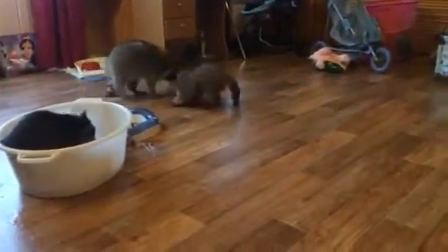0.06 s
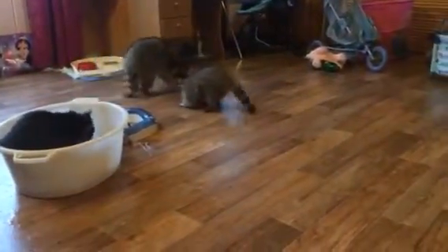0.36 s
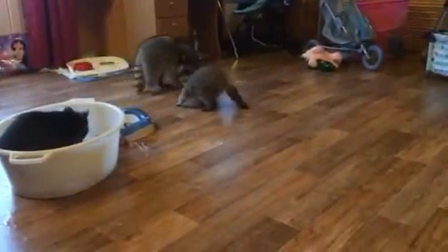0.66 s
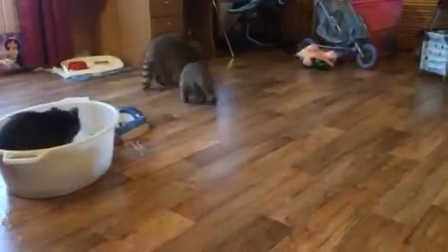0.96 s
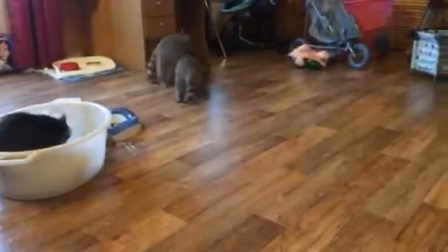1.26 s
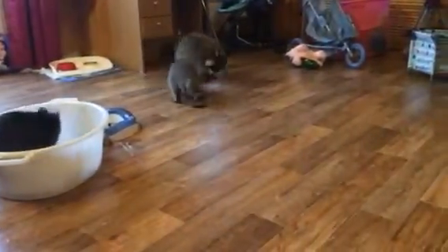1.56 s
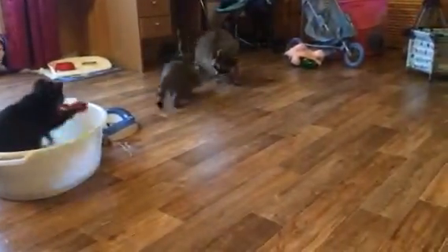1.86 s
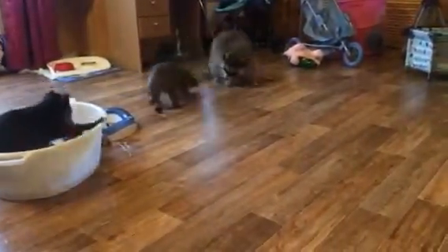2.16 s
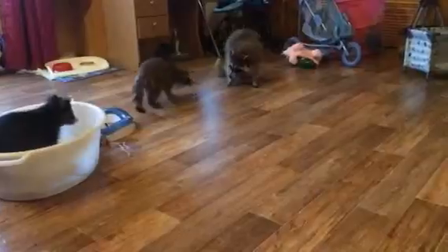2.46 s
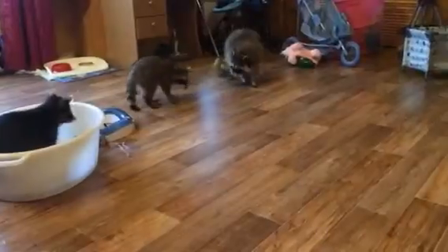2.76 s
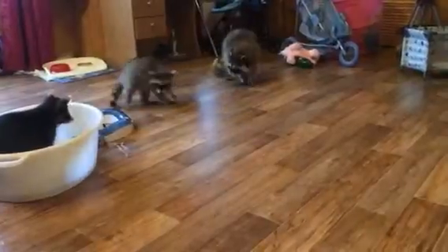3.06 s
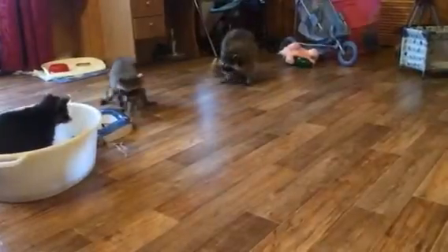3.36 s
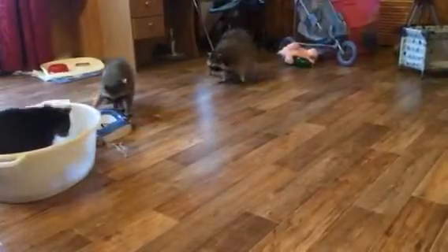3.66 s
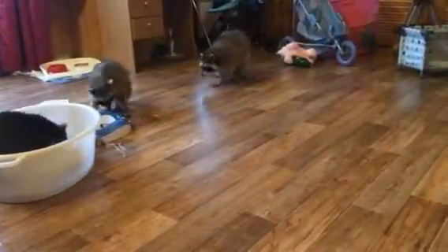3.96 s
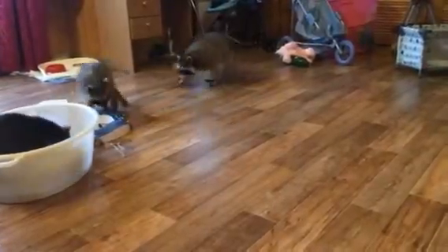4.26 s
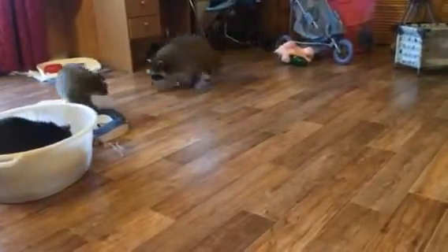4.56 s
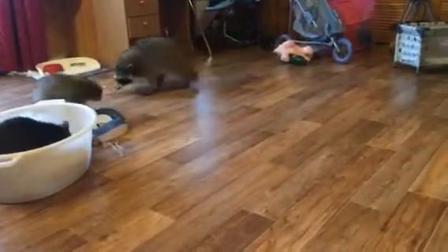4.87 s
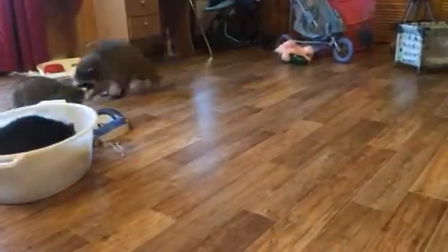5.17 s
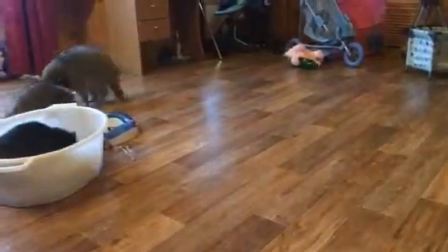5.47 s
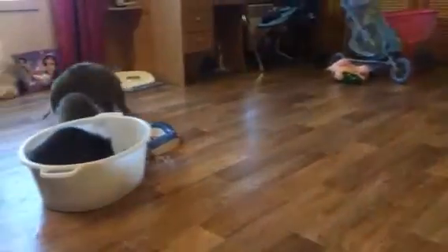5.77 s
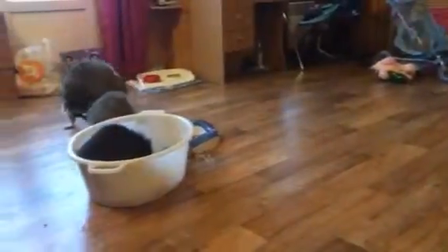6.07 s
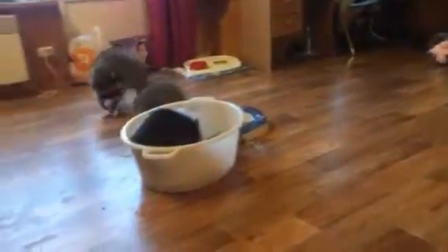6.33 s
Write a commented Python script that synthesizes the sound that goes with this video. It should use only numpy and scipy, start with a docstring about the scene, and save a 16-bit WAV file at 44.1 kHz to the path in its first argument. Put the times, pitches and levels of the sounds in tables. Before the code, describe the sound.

Two raccoons snarl and grumble at each other indoors, with claws pattering and one sharp bang on a hard floor.

```python
"""A living room with a hard floor; two raccoons squabble a few metres from a hand-held camera's microphone.
They snarl in slow rattling pulses as slaps of the vocal folds and rasping air ring chest, throat, mouth
and teeth; they grunt, spit once and grumble with closed mouths. Paws and claws patter, scuff and skid,
and something hard bangs on the floor. The room rings briefly; close up, the hand creaks on the camera."""
import sys
import numpy as np
from scipy import signal
from scipy.io import wavfile
from scipy.ndimage import uniform_filter1d

SR = 44100
rng = np.random.default_rng(int(sys.argv[2]) if len(sys.argv) > 2 else 0)


def dump_mix(stems):
    """Bounce the given channels to the path in sys.argv[1] as a 16-bit WAV at rate SR."""
    frames = np.atleast_2d(stems).T  # one column per channel
    limited = np.clip(frames, -1, 1)  # hard clip at full scale
    pcm = np.round(limited * 32767).astype(np.int16)
    wavfile.write(sys.argv[1], SR, pcm)


N = 286650
T = np.arange(N) / SR


def amp(db):
    return 10 ** (np.asarray(db) / 20)


def unit(x):
    """Scales to rms 1."""
    return x / np.sqrt(np.mean(x ** 2) + 1e-20)


def steady(x):
    """Holds the rms at 1 over a few pulse periods."""
    return x / np.sqrt(abs(uniform_filter1d(x ** 2, size=3200)) + 1e-14)


def read(points, hz):
    """Reads a spectrum on a log-frequency axis."""
    f, value = np.transpose(points)
    return np.interp(np.log(hz + 1), np.log(f), value)


def curves(rows):
    """Each column after the time as a curve over the whole scene."""
    s, *columns = np.transpose(rows)
    return [np.interp(T, s, c) for c in columns]


def gate(rows):
    """One while a table lasts, with soft edges."""
    return uniform_filter1d(1. * ((T >= rows[0][0]) & (T <= rows[-1][0])), size=400)


def swell(start, length, db, attack_share, release_s):
    """Rises over a share of its length, holds, then dies away."""
    rise = np.clip((T - start) / (attack_share * length), 0, 1)
    return amp(db) * rise * np.exp(-np.maximum(T - start - length, 0) / release_s)


def wander(per_s):
    """A random curve of rms about 1, with per_s new values a second."""
    return np.interp(T * per_s, np.arange(N), rng.standard_normal(N))


def pulses(turns):
    """One click at each whole turn."""
    return 1. * (np.diff(np.floor(turns), prepend=np.floor(turns[0])) > 0)


def add(mix, s, sound):
    """Mixes a sound in at s seconds."""
    part = mix[max(round(s * SR), 0):][:len(sound)]
    part += sound[:len(part)]


def colour(x, spectrum, shade=lambda hz: 0):
    """Causal filter of energy 1 from a spectrum and an optional extra dB rule."""
    hz = abs(np.fft.fftfreq(2048, 1 / SR)) + 1
    log_gain = np.log(amp(np.maximum(read(spectrum, hz) + shade(hz), -100)))
    taps = np.fft.ifft(np.exp(np.conj(signal.hilbert(log_gain)))).real
    return signal.fftconvolve(x, taps / np.linalg.norm(taps))[:len(x)]


def resonate(x, hz, width_hz):
    """A steep resonance that follows the curve hz."""
    turn = np.exp(2j * np.pi * np.cumsum(hz * np.ones(N)) / SR)
    r = np.exp(-np.pi * width_hz / SR)
    return 2 * (turn * signal.lfilter([(1 - r) ** 2], [1, -2 * r, r * r], x / turn + 1e-18)).real


# Room tone at the microphone. Each row: frequency in Hz, relative level in dB.
AIR_COLOUR = [(15, -44), (25, -19), (69, -6), (267, -13), (457, -19), (523, -15.5), (722, -22), (782, -21),
              (2120, -31), (2920, -30), (4620, -33), (5140, -31), (15500, -38)]
def air():
    """The quiet room and the hiss of the microphone, wavering slightly."""
    waver = amp(.8 * wander(14))
    return amp(-68.5) * unit(colour(rng.standard_normal(N) * waver, AIR_COLOUR))


# The ring of the living room. Each row: frequency in Hz, seconds to fall 60 dB.
ROOM_DECAY = [(80, .48), (250, .35), (600, .33), (1400, .33), (4000, .37), (8000, .34), (15000, .29)]
def echoes():
    """The room's answer to one spot on the floor: a tail of energy 1 that lasts longest in the bass."""
    hz, t, noise = signal.stft(rng.standard_normal(SR // 2), SR, nperseg=256)
    fade = amp(-60 * t / read(ROOM_DECAY, hz)[:, None])
    tail = signal.istft(noise * fade, SR, nperseg=256)[1][:SR // 2]
    tail *= np.clip((T[:SR // 2] - .003) / .007, 0, 1)
    return tail / np.linalg.norm(tail)


def room(x, wet_db):
    """The direct sound reaches the microphone, then three wall echoes and the tail."""
    tail = echoes()
    for s, gain in [(.0068, .25), (.0105, -0.17), (.0135, 0.18)]:
        add(tail, s, np.array([gain]))
    return (x + amp(wet_db) * signal.fftconvolve(x, tail)[:N]) / np.sqrt(1 + amp(wet_db) ** 2)


# Fur and paws sliding on the floor, and the faint rustle while the animals keep moving.
# Each row: start in seconds, length in seconds, level in dB.
SCUFFS = [(0, 0.048, -66), (0.137, 0.084, -59), (0.281, .055, -58.5), (1.101, 0.074, -43),
          (1.232, .04, -54), (1.289, 0.014, -42), (1.37, 0.22, -57.5), (1.624, 0.12, -57),
          (1.745, 0.11, -59), (1.876, 0.077, -67), (2.107, 0.2, -59), (2.65, 0.091, -58.5),
          (4.084, 0.21, -63.5), (4.674, 0.095, -64.5), (4.937, 0.032, -64.5), (5.05, 0.16, -68),
          (5.574, .18, -63.5), (5.972, 0.16, -65), (6.13, 0.18, -62.5), (6.38, 0.058, -58)]
RUSTLES = [(0, 2.45, -68), (4.095, 0.71, -72), (4.95, 2.1, -69.5)]
# Their hiss from a few metres. Each row: frequency in Hz, relative level in dB.
SCUFF_COLOUR = [(530, -25), (900, 0.5), (1800, -5.5), (2480, -8), (2660, -9), (5180, -8), (6050, -7),
                (7770, -8.5), (11800, -13.5), (15500, -18)]
def scuffs():
    """Grainy friction hiss: single strokes over a faint uneven rustle."""
    grains = rng.standard_normal(N) * amp(2.1 * wander(500))
    stroke_power = sum(swell(*row, attack_share=0.37, release_s=0.02) ** 2 for row in SCUFFS)
    rustle = sum(swell(*row, attack_share=0.031, release_s=0.052) for row in RUSTLES)
    rustle *= amp(1.5 * wander(31))
    return unit(colour(grains, SCUFF_COLOUR)) * np.sqrt(stroke_power + rustle ** 2)


# Three open-mouthed snarls, a few metres off.
# Each row: time in seconds, effort in dB, mouth resonance in Hz.
WARNING = [(.005, -48.5, 1160), (.115, -46.5, 1490), (.195, -47, 1440), (.29, -53, 1050), (.37, -51, 910),
           (.5, -72, 920)]
RETORT = [(1.225, -43, 1320), (1.28, -41.5, 1720), (1.37, -56, 1630), (1.44, -48, 1540), (1.51, -47, 1630)]
THREAT = [(1.51, -46, 1730), (1.555, -42, 1680), (1.62, -42, 1440), (1.675, -44, 1490), (1.735, -50, 1190),
          (1.79, -48, 1096), (1.86, -77, 990)]
# Each rattle slows as the air runs out. Each row: the snarl's course, time of one pulse in seconds,
# pulse rate there in Hz, slowing in Hz a second, breathiness from 0 to 1, seconds for the folds to catch.
RATTLES = [(WARNING, .1002, 42, 9, .2, .09), (RETORT, 1.2612, 39.6, 16, .14, .035),
           (THREAT, 1.6376, 42.6, 42, .13, .1)]
# The timbre of each snarl. Each row: mouth resonance width in Hz, teeth resonance in Hz,
# then chest, throat and teeth levels in dB relative to the mouth at full effort.
SNARL_TIMBRES = [(710, 2290, -5, -8.5, -16), (380, 2470, -9, -14.5, -24), (410, 2350, -10.5, -10, -8)]
def snarl(course, pulse_at, rate, slowing, breath, catch_s,
          width_hz, teeth_hz, chest_db, throat_db, teeth_db):
    """Slow slaps of the vocal folds and rasping air ring chest, throat, mouth and teeth."""
    effort, mouth_hz = curves(course)
    slack_db = effort.max() - effort
    jaw_open = np.clip((mouth_hz - 1080) / 450, 0, 1)
    # more breath until the folds catch, and again as the jaws close
    loose = 1 - np.clip((T - course[0][0]) / catch_s, 0, 1) ** 4
    breathy = np.clip(breath + .6 * loose + 0.55 * (1 - jaw_open) ** 2, 0, 1)
    age = np.clip(T - pulse_at, -.5, .5)
    turns = (T - pulse_at) * (rate - slowing * age / 2)
    stray_slaps = .35 * (rng.random(N) < 25 / SR)
    slaps = unit((pulses(turns) + stray_slaps) * amp(1.5 * wander(40)))
    airflow = 5.1 + np.exp(-(turns % 1) / 0.028)
    rasp = unit(rng.standard_normal(N) * airflow * amp(2 * wander(250)))
    drive = np.sqrt(1 - breathy) * slaps + np.sqrt(breathy) * rasp
    # open jaws damp the mouth resonance; as they close it sinks and narrows to a whine
    wide = steady(resonate(drive, mouth_hz, width_hz))
    whine = steady(resonate(drive, mouth_hz, width_hz=250))
    mouth = amp(-slack_db) * steady(jaw_open * wide + (1 - jaw_open) * whine)
    # the lips draw back and lift the teeth resonance
    bared_hz = teeth_hz + 2.4 * np.maximum(mouth_hz - 1540, 0)
    # the teeth ring only when pushed; throat and chest hold on as the effort drops
    teeth = amp(teeth_db - 0.89 * slack_db) * steady(resonate(drive, bared_hz, width_hz=510))
    throat = amp(throat_db - 0.48 * slack_db) * steady(resonate(drive + rasp, 720, width_hz=290))
    chest = amp(chest_db - 0.55 * slack_db) * steady(resonate(drive + 0.15 * rasp, 135, width_hz=330))
    band = signal.butter(3, [70, 3400], "band", fs=SR, output="sos")
    voice = signal.sosfilt(band, mouth - teeth + throat + chest)
    return amp(effort.max()) * voice * gate(course)


# Pads and claws skidding on the varnish.
# Each row: middle in seconds, half length in seconds, squeal in Hz, level in dB.
SKIDS = [(0.066, .07, 8800, -65.5), (0.158, .03, 9900, -66.5), (1.034, .011, 2230, -58),
         (1.678, .012, 3780, -59), (0.307, 0.019, 3870, -64.5), (2.684, .04, 6350, -61.5),
         (6.458, .025, 3460, -69)]
def skids():
    """Friction noise gathers round one squealing pitch."""
    out = np.zeros(N)
    for s, half_length, hz, db in SKIDS:
        squeal = unit(resonate(rng.standard_normal(N), hz, width_hz=.13 * hz))
        out += amp(db) * np.exp(-((T - s) / half_length) ** 2) * squeal
    return out


# Grumbles, faint across the room. Each row: start in seconds, length in seconds, level in dB.
GRUMBLES = [(0.532, 0.24, -53), (0.785, 0.12, -50), (0.991, 0.19, -51.5), (1.882, 0.25, -55),
            (5.298, 0.24, -60), (5.517, 0.29, -58.5), (6.21, 0.3, -56)]
# Their muffled tone. Each row: frequency in Hz, relative level in dB.
GRUMBLE_COLOUR = [(50, -20), (105, 0), (160, -4.5), (210, 4.5), (270, -5), (400, -6.5), (700, -13.5),
                  (1200, -22.5), (2200, -44.5), (5000, -68.5)]
def grumbles(pitch_hz=105):
    """A low uneven voice muffled by the closed mouth."""
    turns = np.cumsum(pitch_hz * (1 + 0.038 * wander(60))) / SR
    drive = unit(pulses(turns) * amp(wander(70))) + 1.8 * rng.standard_normal(N)
    level = sum(swell(*row, attack_share=0.17, release_s=0.031) for row in GRUMBLES)
    return steady(colour(drive, GRUMBLE_COLOUR)) * level


def blow(decay_s, rise_s, wet_db):
    """One contact, a puff of noise with the echoes of its own spot; a longer one carries more energy."""
    t = T[:SR // 2]
    puff = rng.standard_normal(len(t)) * np.exp(-t / decay_s) * (1 - np.exp(-t / rise_s))
    gain = np.sqrt(decay_s * SR / 2 / (1 + amp(wet_db) ** 2))
    return gain * (puff / np.linalg.norm(puff) + amp(wet_db) * echoes())


# Claws and hard things ticking on the floor.
# Each row: start in seconds, level in dB, tilt above 2 kHz in dB per octave.
TICKS = [(.825, -51, 0), (1.146, -30.5, 4), (1.288, -36, -3), (1.508, -45, 3), (1.649, -46.5, 1),
         (1.674, -42, -12), (1.771, -44, -1), (2.029, -46, -.5), (2.488, -37.5, -0.5), (2.913, -60.5, -0.5),
         (3.77, -59.5, -14.5), (4.473, -55.5, -1.5), (4.549, -34, 0.5), (4.558, -42, 8), (4.922, -54, 0),
         (4.95, -42, -19), (4.973, -41.5, -12), (5.079, -53, 7), (5.517, -52, -3), (6.182, -38.5, 12.5),
         (6.406, -48.5, -11)]
# The tone of a tick and of the snap. Each row: frequency in Hz, relative level in dB.
TICK_COLOUR = [(300, -37.5), (1500, -6.5), (3000, -1.5), (6000, 2.5), (8000, -0.5), (11000, -3),
               (15500, -13)]
SNAP_COLOUR = [(1500, -8.5), (3000, -26), (4100, -10), (5000, -12), (6400, -8.5), (7600, -20), (9300, 0),
               (10000, -4), (10800, -1.5), (12200, -12), (14600, 0), (15500, -3)]
def ticks():
    """Brief hard contacts make bright clicks, and one brittle snap."""
    out = np.zeros(N)
    for s, db, tilt in TICKS:
        hardness = lambda hz: tilt * np.log2(np.maximum(hz, 2000) / 2000)
        add(out, s, amp(db) * colour(blow(0.0031, rise_s=.0003, wet_db=-0.5), TICK_COLOUR, hardness))
    add(out, 5.8543, amp(-22.5) * colour(blow(0.0016, rise_s=.0015, wet_db=1), SNAP_COLOUR))
    return out


# The hard floor's modes. Each row: frequency in Hz, relative level in dB, seconds to fall 60 dB.
FLOOR_MODES = [(90, -15, 0.2), (194, -14, .2), (302, -1, 0.13), (361, -10, 0.079), (516, -7, .14),
               (571, -8, 0.084), (623, -10.5, 0.11), (690, -19.5, 0.35), (864, -14, 0.15), (992, 1, 0.062),
               (1355, -17, 0.1), (1393, -3, .13)]
def floor_ring():
    """The modes of the struck floor dying away."""
    t = T[:SR // 5]
    ring = sum(amp(db - 60 * t / t60) * np.sin(2 * np.pi * hz * t) for hz, db, t60 in FLOOR_MODES)
    return np.pad(ring * np.minimum(t / 0.0013, 1), (0, SR // 2 - len(t)))


# The tone all knocks share. Each row: frequency in Hz, relative level in dB.
KNOCK_COLOUR = [(60, -26), (200, 8.5), (370, 3.5), (560, 2), (820, -5), (1050, -3), (1400, -0.5),
                (2100, -6), (2900, -11), (6000, -4.5), (15000, 1)]
def knock(db, centre_hz, decay_s):
    """A short blow that rings the floor; a softer contact swells more slowly and lasts longer."""
    contact_band = lambda hz: -14 * np.hypot(np.log2(hz / centre_hz), .55)
    ring = amp(-6.5) * np.sqrt(decay_s) * floor_ring()
    contact = blow(decay_s, rise_s=0.38 * decay_s, wet_db=0)
    return amp(db) * colour(contact + ring, KNOCK_COLOUR, contact_band)


# Paws and small things knocking on the floor, a few metres off.
# Each row: start in seconds, level in dB, centre in Hz, decay in seconds.
KNOCKS = [(0.887, -38.5, 626, 0.011), (1.05, -38.5, 910, 0.00088), (1.688, -31.5, 620, 0.0044),
          (1.896, -35.5, 650, 0.0052), (2.109, -44, 700, 0.008), (2.333, -47, 560, 0.012),
          (2.459, -53.5, 600, 0.054), (2.674, -37.5, 720, 0.015), (2.82, -48.5, 696, 0.016),
          (3.057, -61, 700, 0.0094), (3.411, -60.5, 583, 0.015), (3.976, -60.5, 502, 0.011),
          (4.036, -54.5, 525, 0.016), (4.535, -47.5, 590, 0.0029), (4.548, -33.5, 1860, 0.0028),
          (4.557, -35, 1870, 0.004), (4.61, -38, 680, 0.0029), (4.634, -40, 1110, 0.0068),
          (4.665, -36, 905, 0.0035), (4.735, -40.5, 1330, 0.0059), (4.885, -55, 900, 0.0071),
          (4.951, -35, 960, 0.0058), (4.973, -35, 845, 0.0066), (5.164, -44.5, 750, .012),
          (5.517, -47, 587, 0.0069), (5.627, -44, 1040, 0.0054), (6.209, -34, 780, 0.0045),
          (6.268, -31, 1190, 0.0026), (6.285, -44.5, 1170, 0.041), (6.406, -38, 950, 0.0042)]
# Stretches of walking. Each row: start in seconds, end in seconds, level in dB.
WALKS = [(2.001, 2.35, -57), (4.079, 4.5, -61), (5.998, 6.5, -45.5)]
def knocks(step_s=0.16, spread_db=2.5):
    """The distinct knocks, and soft uneven footfalls between them."""
    out = np.zeros(N)
    for s, *row in KNOCKS:
        add(out, s, knock(*row))
    for start, end, db in WALKS:
        for s in np.arange(start, end, step_s):
            lands_at = s + step_s * rng.random() / 2
            step_db = db + spread_db * rng.standard_normal()
            add(out, lands_at, knock(step_db, centre_hz=620, decay_s=0.0094))
    return out


# Low thuds: weight landing softly on the floor, and at 5.973 s the hand's last jolt on the camera. # Each row:
# start in seconds, level in dB, pitch in Hz.
THUMPS = [(1.099, -29, 132), (1.511, -36.5, 187), (1.535, -35, 165), (3.824, -62, 150), (4.762, -43.5, 162),
          (5.224, -46.5, 122), (5.973, -39.5, 134), (6.155, -43, 172), (6.27, -38.5, 160)]
def thumps():
    """A few low cycles of the floor under a landing paw, or of the camera's case jolted by the hand."""
    out, t = np.zeros(N), T[:SR // 5]
    age = t / 0.0022
    for s, db, hz in THUMPS:
        add(out, s, amp(db) * age * np.exp(1 - age) * np.sin(2 * np.pi * hz * t))
    return out


# The spit of the lunge, from a few metres. Each row: frequency in Hz, relative level in dB.
SPIT_COLOUR = [(47, -48), (80, -40), (241, -2), (300, -12.5), (456, 1), (809, 2.5), (1010, -5),
               (1430, -3.5), (2280, -7), (3390, -16), (3780, -10.5), (4410, -20), (7660, -22), (15500, -54)]
def spit():
    """An explosive, fluttering blast of air swells, holds and is cut off."""
    breath = rng.standard_normal(N) * amp(2 * wander(220))
    level = swell(start=1.1144, length=0.088, db=-34.5, attack_share=0.36, release_s=0.035)
    return steady(colour(breath, SPIT_COLOUR)) * level


# Short grunts that break into the snarls. Each row: start in seconds, length in seconds, level in dB.
GRUNTS = [(1.45, 0.091, -48.5), (1.544, 0.037, -40.5), (1.694, 0.053, -47.5)]
def grunts():
    """Fluttering air rings the throat alone."""
    breath = rng.standard_normal(N) * amp(3.4 * wander(150))
    level = sum(swell(*row, attack_share=0.22, release_s=0.015) for row in GRUNTS)
    return steady(resonate(breath, 566, width_hz=550)) * level


# The dull crunch of the bang across the room. Each row: frequency in Hz, relative level in dB.
BANG_COLOUR = [(50, -15.5), (150, -16.5), (320, -1.5), (400, -7), (560, 5), (850, -3.5), (1100, -3),
               (1450, 1.5), (1750, -7), (2200, -4), (3200, -17.5), (6000, -20.5), (10000, -34.5),
               (15000, -34)]
def bang():
    """A hard edge cracks on the floor, then the full weight lands and rings."""
    out, t = np.zeros(N), T[:SR // 2]
    add(out, 2.5037, amp(-23) * colour(blow(0.0035, rise_s=.0002, wet_db=-2), TICK_COLOUR))
    add(out, 2.505, amp(-14) * colour(blow(0.006, rise_s=0.00033, wet_db=-1), BANG_COLOUR))
    # the weight lands as one blunt push with little treble
    blunt = lambda hz: -10 * np.log10(1 + (hz / 1700) ** 4)
    add(out, 2.5068, amp(-3) * colour(1. * (t == 0), BANG_COLOUR, blunt))
    add(out, 2.505, amp(-21) * floor_ring())
    return out


# Handling noise, right at the microphone. Each row: time in seconds, slips a second, level in dB.
HAND_SLIPS = [(5.72, 55.6, -53), (5.81, 56, -38), (5.85, 64, -36), (5.89, 45, -38.5), (5.94, 46, -32.5)]
def hand_creak(case_hz=125):
    """Skin sticks and slips unevenly on the camera; each slip jolts its case."""
    rate, db = curves(HAND_SLIPS)
    uneven = 1 + np.tanh(wander(70)) / 2
    turns = np.cumsum(rate * uneven * gate(HAND_SLIPS)) / SR
    slips = pulses(turns) * amp(db + 0.75 * wander(59.5))
    t = T[:SR // 10]
    fade = np.exp(-t / 0.0071) * (1 - np.exp(-t / 0.000057))
    jolt = -fade * np.sin(2 * np.pi * case_hz * t + .5)
    return signal.fftconvolve(slips, jolt)[:N]


def scene():
    """Voices, scuffles and blows out in the room, the camera's own noises close up; mono."""
    snarls = sum(snarl(*rattle, *timbre) for rattle, timbre in zip(RATTLES, SNARL_TIMBRES))
    animals = room(snarls, wet_db=-3.5)
    animals += room(grumbles() + grunts() + spit() + scuffs() + skids(), wet_db=-8)
    floor = bang() + knocks() + ticks() + room(thumps(), wet_db=-5)
    return (animals + floor + hand_creak() + air())[None]


def record(dry):
    """The small microphone loses the deepest bass; the highest treble is cut off."""
    thin = signal.sosfilt(signal.butter(2, 42, "high", fs=SR, output="sos"), dry)
    band_limit = signal.firwin(511, 15450, window=("kaiser", 9), fs=SR)
    return signal.oaconvolve(thin, band_limit[None], "same")


dry = scene()
out = record(dry)
dump_mix(out)
```